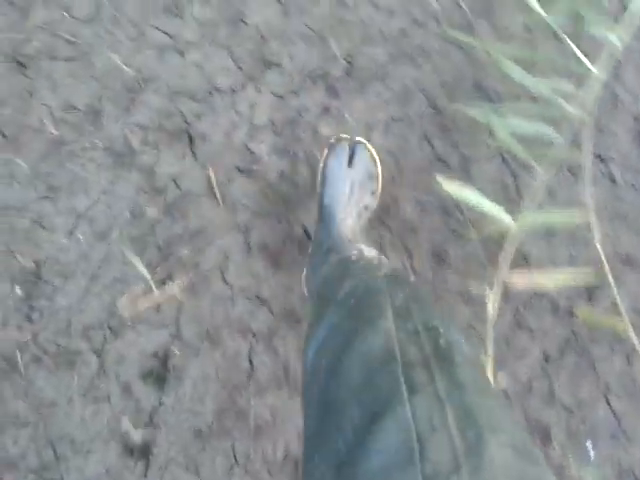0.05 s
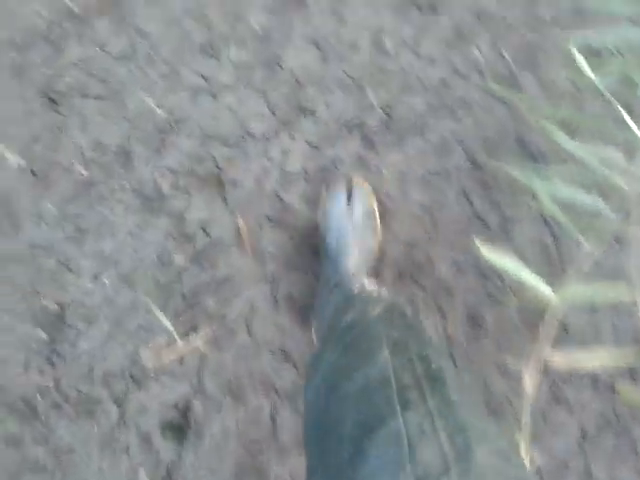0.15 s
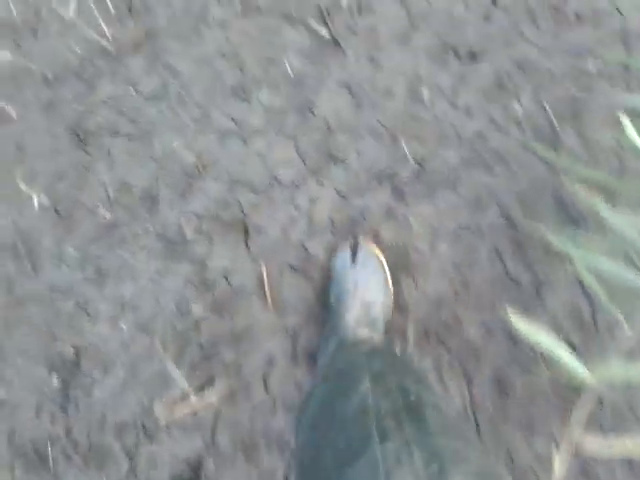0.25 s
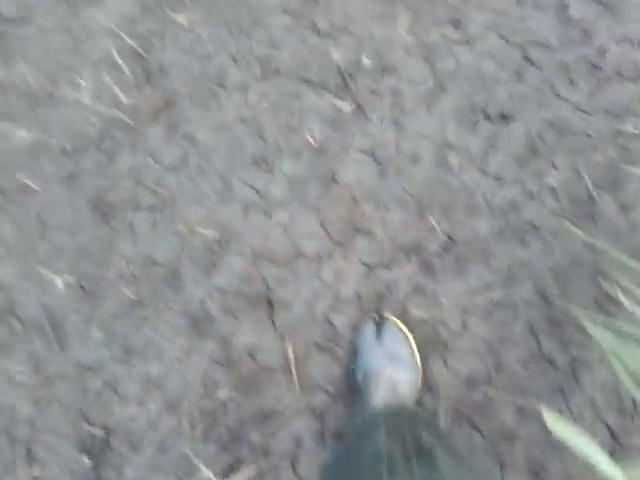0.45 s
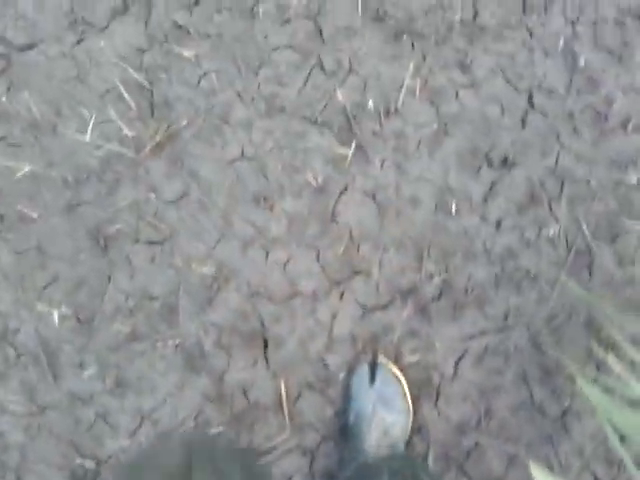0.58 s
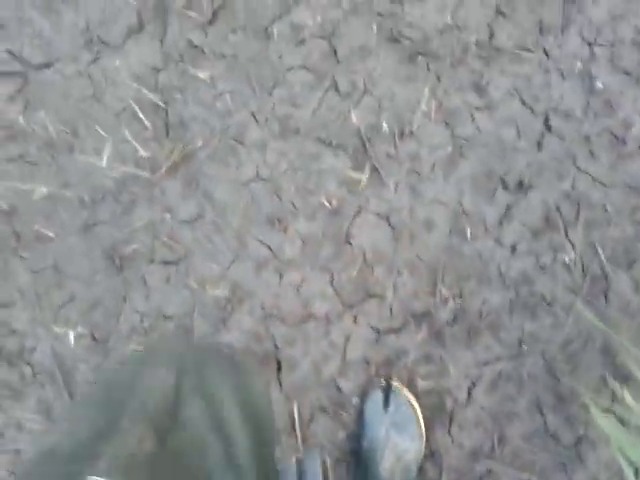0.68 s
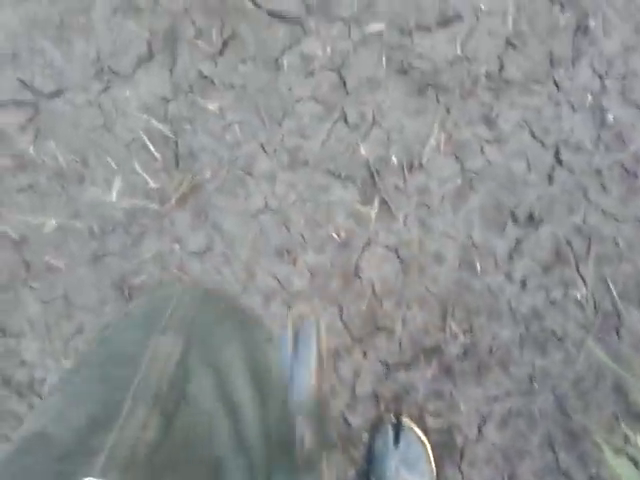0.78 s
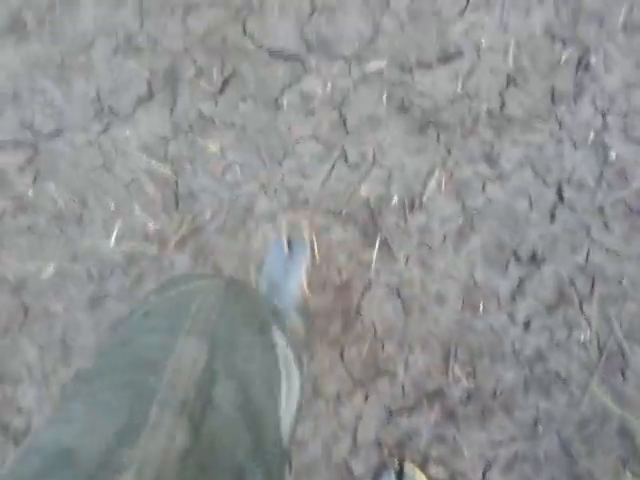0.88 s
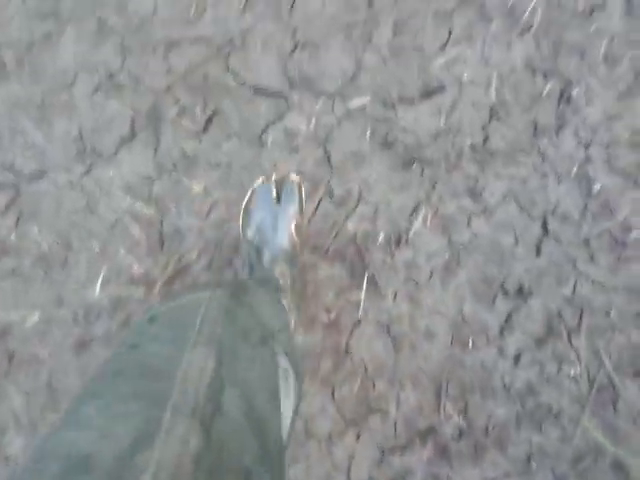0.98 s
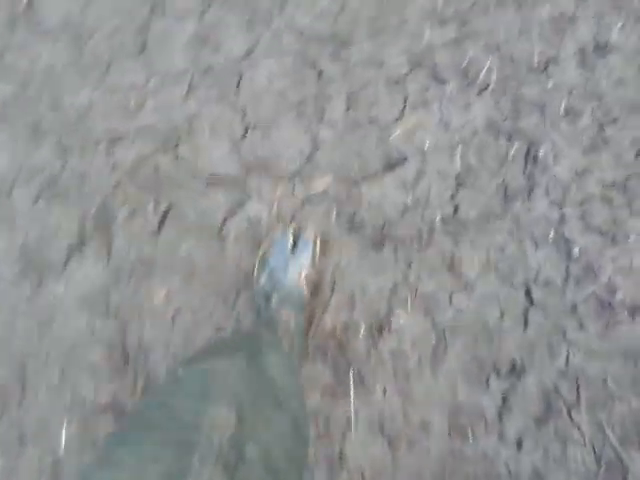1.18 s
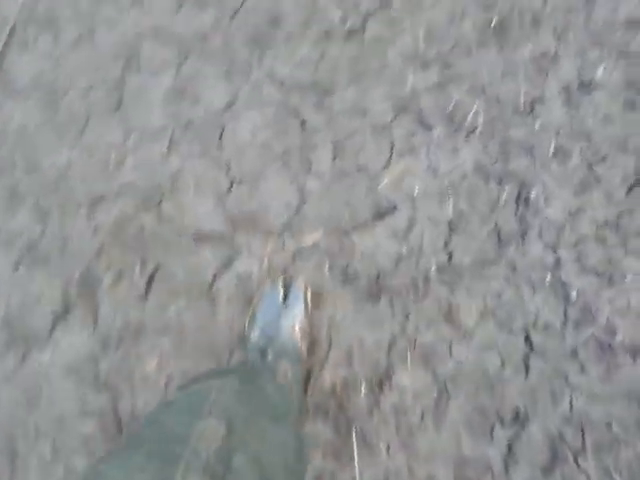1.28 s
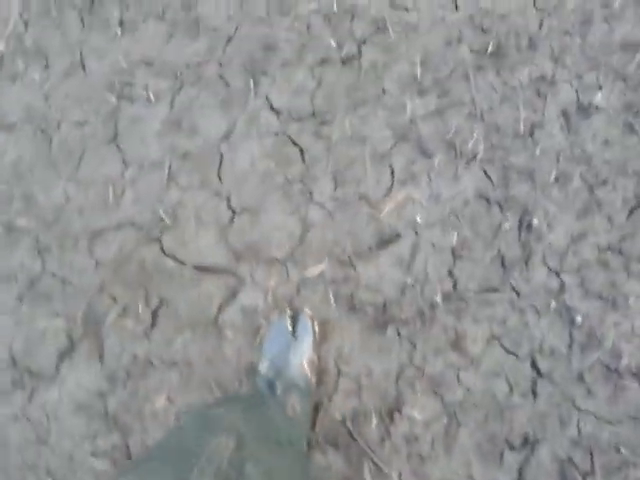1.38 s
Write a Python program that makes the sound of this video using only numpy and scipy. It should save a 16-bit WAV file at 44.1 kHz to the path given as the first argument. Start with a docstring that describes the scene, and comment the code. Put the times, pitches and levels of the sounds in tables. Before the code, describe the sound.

Footstep on dry cracked mud in rubber waders, close and boxy through a small camera microphone, outdoors. Faint wind hiss throughout. A short wavering squeak at 0.1-0.2 s leads to a loud, hard double knock at about 0.27 and 0.32 s, distorted, with quick gritty decay. Rustling and crumb pops continue until 0.8 s, then near quiet; light crackles return at 1.05, denser crunching at 1.23-1.34, and sharp ticks at 1.43-1.45 s.

```python
"""Outdoors on dry cracked mud: someone walks in rubber waders beneath a narrow-band camera microphone.
Wind hiss is noise coloured and flickering in half-octave bands; rustle is a dense sum of random grains.
A wader squeak is a fluttering tone with a weak octave; crumbs of crust pop as short rings with a sharp tick.
One boot lands as decaying modes with a noise tail, crust snaps and bass bumps, and overloads the recorder."""
import sys
import numpy as np
from scipy import signal
from scipy.fft import rfft, irfft
from scipy.io import wavfile
from scipy.ndimage import uniform_filter1d

SR = 44100
rng = np.random.default_rng(int(sys.argv[2]) if len(sys.argv) > 2 else 0)


def wav_record(signal):
    """Record a signal, one row per channel, as 16-bit PCM in the file named by sys.argv[1]."""
    frames = np.transpose(np.atleast_2d(signal))
    bounded = np.clip(frames, -1, 1)
    # unit amplitude maps onto the largest positive 16-bit level
    quanta = np.round(bounded * 32767).astype(np.int16)
    wavfile.write(sys.argv[1], SR, quanta)


N = 63945

# Spectrum of the wind hiss, relative: [f/Hz, density level/dB]
WIND_SPECTRUM = [(20, -36.5), (40, -28.5), (150, -21), (200, -17.5), (250, -5.5), (330, 1.5), (680, -2.5),
                 (1100, -4), (1600, -8.5), (2500, -12), (3400, -7.5), (3750, -16), (4100, -25), (4400, -38),
                 (4700, -71.5), (9000, -120)]
# Wind strength, relative: [t/s, level/dB of bands below 2.5 kHz, level/dB of bands above]
WIND_STRENGTH = [(0, 1, 3.5), (.09, 0, 2.5), (.2, 0, 0), (.4, 1, 1), (.6, 0, 0), (.75, 0, .7), (.85, .3, 0),
                 (1, -2, 0), (1.1, 1.5, -.7), (1.3, -.7, 0), (1.45, 0, 1.5)]
WIND_DB, WIND_FLICKER_DB = -48.5, 1.0  # overall rms level; scale of each band's flicker

# Rustle of the waders, before the microphone: [t/s, level/dB]
RUSTLE_LEVEL = [(0, -52.5), (.08, -49), (.15, -53.5), (.22, -51.5), (.3, -46), (.36, -48.5), (.47, -44),
                (.52, -47.5), (.62, -48), (.7, -43), (.79, -55), (.83, -61), (1, -58.5), (1.1, -55.5),
                (1.2, -53.5), (1.25, -43), (1.33, -48), (1.4, -62), (1.45, -32.5)]
RUSTLE_PER_S, RUSTLE_SPREAD_DB = 640, 2  # grain rate; mean of the exponential excess in level
RUSTLE_HZ, RUSTLE_OCTAVES = 625, 0.81  # median pitch and its standard deviation before limiting
RUSTLE_CYCLES, RUSTLE_TILT_DB = 1.3, 1.5  # sets grain length (half as many periods); dB per octave

# Rubber squeak, before flutter and microphone: [t/s, f/Hz, level/dB]
SQUEAK_TRACK = [(.094, 660, -57), (.101, 681, -42), (.11, 675, -58), (.121, 660, -56), (.125, 668, -40),
                (.133, 721, -32), (.138, 700, -52), (.145, 683, -39), (.158, 686, -39), (0.165, 690, -36.5),
                (.174, 730, -38), (.187, 770, -39.5), (.192, 787, -54), (.204, 795, -41), (.21, 790, -60)]
SQUEAK_FLUTTER_DB, SQUEAK_OCTAVE_DB = 2.2, -21  # flutter scale; octave against fundamental

# Popping crumbs of crust, the last row a knock just as the sound ends: [t/s of centre, peak level/dB, f/Hz,
# length/ms, tick level/dB against the ring]
CRUMB_POPS = [(0.035, -36.0, 450.0, 3.0, -10.0), (0.083, -38.0, 500.0, 3.0, -8.0),
              (0.1345, -35.0, 370.0, 6.0, -15.0), (0.1804, -42, 1834.0, 1.4, -3.0),
              (0.2285, -47.5, 3540, 2.2, -3.0), (0.236, -33.2, 700, 5, -10.0),
              (0.3269, -28.5, 307, 6.8, -10.0), (0.3432, -37, 840.0, 8.3, -10.0),
              (0.3759, -38, 1180, 1.16, -3.0), (0.4014, -44, 3270, 0.89, -3.0),
              (0.4164, -44, 2000.0, 1.6, -3.0), (0.4182, -38, 435, 4.1, -10.0),
              (0.425, -42, 2181.0, 1.6, -3.0), (0.4555, -38, 1189.0, 1.5, -3.0),
              (0.4565, -35.0, 400.0, 3.0, -10.0), (0.462, -45, 2800, 1.8, -3.0),
              (0.4662, -42.5, 1170, 3.5, -3.0), (0.475, -35.0, 420.0, 3.0, -10.0),
              (0.4911, -31.5, 537, 2.6, -10.0), (0.4954, -34, 1542.0, 1.87, -3.0),
              (0.498, -33.0, 500.0, 3.0, -10.0), (0.5072, -33, 463, 2.8, -10.0),
              (0.5113, -31.5, 716, 1.7, -10.0), (0.5161, -37.5, 1980, 1.7, -3.0),
              (0.5531, -36.5, 2020, 1.2, -3.0), (0.5622, -35.5, 576, 4, -10.0),
              (0.5758, -29.5, 240, 5.9, -10.0), (0.5835, -35.0, 260.0, 5.0, -20.0),
              (0.5985, -36.0, 450.0, 3.0, -6.0), (0.6545, -35, 1280, 1.2, -3.0),
              (0.661, -38.0, 400.0, 3.0, -8.0), (0.685, -37.0, 550.0, 3.0, -8.0),
              (0.7014, -37.5, 707.0, 5.7, -10.0), (0.7254, -35.5, 1950, 0.75, -3.0),
              (0.738, -38.0, 600.0, 3.0, -8.0), (0.7438, -41, 1100, 3.5, -3.0),
              (0.7755, -36.5, 455, 4.6, -10.0), (0.846, -41.0, 1350.0, 3.5, -10.0),
              (1.056, -38.0, 450.0, 8.0, -10.0), (1.081, -39.0, 600.0, 3.0, -8.0),
              (1.101, -42, 1400, 3.5, -3.0), (1.11, -42, 1265, 3.5, -3.0),
              (1.149, -39.0, 1300.0, 2.0, -5.0), (1.168, -38.0, 650.0, 3.0, -4.0),
              (1.2275, -35.0, 500.0, 3.0, -10.0), (1.2353, -38, 2000.0, 1.5, -3.0),
              (1.2378, -24, 540, 3.07, -10.0), (1.2466, -41, 1681.0, 2.6, -3.0),
              (1.253, -29.5, 1460, 1.17, -3.0), (1.2548, -28.0, 550.0, 2.4, -12.0),
              (1.2705, -36.0, 600.0, 5.0, -6.0), (1.2949, -36.5, 2000.0, 1.95, -3.0),
              (1.2985, -29.5, 714, 4.1, -10.0), (1.3022, -28, 800, 1.46, -10.0),
              (1.307, -35.5, 1450, 2.0, -3.0), (1.3349, -32.5, 740, 2.8, -10.0),
              (1.3707, -45, 3510, 2.8, -3.0), (1.3781, -41, 3668.0, 0.89, -3.0),
              (1.3891, -40, 2280, 3.1, -3.0), (1.3895, -38.0, 800.0, 1.52, -2.0),
              (1.4045, -37.0, 600.0, 3.0, -8.0), (1.435, -23.0, 1200.0, 1.3, -1.0),
              (1.4492, -27.0, 900.0, 2.0, -6.0)]
# Resonances excited by a tick: [f/Hz, level/dB against the tick level, length/ms]
TICK_RESONANCES = [(900, -3, 0.807), (2000, -4.5, 1.0), (3534, -4, 1.8)]

# One-sided thuds that shake the camera body: [t/s of centre, signed peak, half length to 1/e / ms]
BODY_THUDS = [(0.2691, 0.19, 0.43), (.31639, -0.215, 1.01), (0.5777, 0.000043, 1.3)]

# Boot knocks on the crust: [t/s of start, signed gain of the low, the middle and the high mode]
BOOT_KNOCKS = [(.24431, -.1, .36, -.28), (.25928, .14, -.33, .26), (.26702, .06, -.82, 1.22),
               (.26858, .75, .44, 3.0), (.31407, .01, 1.14, -1.55)]
# Modes of boot and crust: [f/Hz, 60 dB decay time/s]
BOOT_RESONANCES = [(480, 0.02), (688, 0.012), (1104, 0.0039)]
# Crust snapping under the sole: [t/s of centre, peak level/dB, f/Hz, length/ms]
CRUST_SNAPS = [(.26923, 0.5, 2690, 0.59), (.31596, 2, 1905, 0.37)]
KNOCK_RISE_S = .0007  # time constant of the onset
DEBRIS_DB, DEBRIS_T60_S, DEBRIS_HZ = -40, .07, 560  # level against the knock, decay time, centre

MIC_LOW_HZ, MIC_HIGH_HZ = 218, 4050  # half-power edges of the microphone band
CLIP, HISS_DB, TOP_HZ = .715, -100, 16500  # recorder overload limit, hiss level, top cutoff


def undb(db):
    """Level and amplitude: a gain is ten to the power of the decibels over twenty."""
    return 10 ** (np.asarray(db) / 20)


def unit(x):
    """Normalisation: a signal divided by its root mean square has rms 1."""
    return x / np.sqrt(np.mean(x ** 2))


def walk(rate):
    """Smoothed randomness: values held 1 / rate s are averaged twice and scaled up again."""
    hold = int(SR / rate)
    steps = np.repeat(rng.standard_normal(N // hold + 1), hold)
    slewed = uniform_filter1d(uniform_filter1d(steps, hold), hold)
    return 1.7 * slewed[:N]


def band(x, hz, width):
    """Resonance: a second-order peak passes a band of the given width in Hz."""
    return signal.lfilter(*signal.iirpeak(hz, hz / width, fs=SR), x)


def pops(rows, phases):
    """Transient oscillation: a cosine of few cycles under a Gaussian of quick swell and slower fade."""
    pad = 2048  # room for bursts that cross either end
    out = np.zeros(N + 2 * pad)
    for (s, db, hz, ms), phase in zip(rows, phases):
        half = int(ms * SR / 500)
        t = np.arange(-half, half + 1) / SR
        width_ms = ms * np.where(t < 0, .5, .7)
        shape = np.exp(-(t * 1000 / width_ms) ** 2)
        at = pad + int(s * SR) - half
        out[at:at + len(t)] += undb(db) * shape * np.cos(2 * np.pi * (hz * t + phase))  # phase in cycles
    return out[pad:pad + N]


def wind():
    """Spectral shaping: coloured noise splits into overlapping bands that follow the wind and flicker apart."""
    hz, db = np.array(WIND_SPECTRUM).T
    f = np.fft.rfftfreq(N, 1 / SR)[1:]
    colour = undb(np.interp(np.log(f), np.log(hz), db))
    noise = rfft(rng.standard_normal(N))[1:] * colour
    t = np.arange(N) / SR
    s, low_db, high_db = np.array(WIND_STRENGTH).T
    out = 0
    for centre in np.arange(4, 13, .5):  # log2 of the band centre in Hz
        weight = np.clip(1 - 2 * abs(np.log2(f) - centre), 0, 1)
        part = irfft(np.r_[0, noise * weight], N)
        strength_db = np.interp(t, s, low_db if centre < 11.4 else high_db)
        out = out + part * undb(strength_db + WIND_FLICKER_DB * walk(15))
    return unit(out) * undb(WIND_DB)


def rustle():
    """Granular superposition: many random rubbery bursts merge into a patter that follows the leg movement."""
    u = rng.random((2000, 5))[:int(RUSTLE_PER_S * N / SR)]
    start = u[:, 0] * N / SR
    # two uniform draws make one normal deviate
    normal = np.sqrt(-2 * np.log(1 - u[:, 1])) * np.cos(2 * np.pi * u[:, 2])
    octaves = RUSTLE_OCTAVES * normal
    hz = np.clip(RUSTLE_HZ * 2 ** octaves, 200, 4000)
    db = -RUSTLE_SPREAD_DB * np.log(1 - u[:, 3]) + RUSTLE_TILT_DB * octaves
    length_ms = 1000 * RUSTLE_CYCLES / hz / 2
    grains = pops(np.c_[start, db, hz, length_ms], u[:, 4])
    s, level_db = np.array(RUSTLE_LEVEL).T
    return unit(grains) * undb(np.interp(np.arange(N) / SR, s, level_db))


def squeak():
    """Frequency modulation: rubber on rubber sounds a tone of wavering pitch and level with a weak octave."""
    t = np.arange(N) / SR
    s, hz, db = np.array(SQUEAK_TRACK).T
    pitch = np.interp(t, s, hz) * (1 + .035 * walk(220))
    phase = 2 * np.pi * np.cumsum(pitch) / SR
    tone = np.sin(phase) + undb(SQUEAK_OCTAVE_DB) * np.sin(2 * phase)
    level_db = np.interp(t, s, db, -120, -120) + SQUEAK_FLUTTER_DB * walk(260)
    return np.sqrt(2) * tone * undb(level_db)


def crumbs():
    """Impulse excitation: each crumb is a short ring with a sharp multi-resonant tick at its front."""
    s, db, hz, ms, tick_db = np.array(CRUMB_POPS).T
    u = rng.random((len(s), 4))
    out = pops(np.c_[s, db, hz, ms], u[:, 0])
    front = s - ms / 4000  # a quarter length ahead of the centre
    same = np.ones(len(s))
    for k, (mode_hz, mode_db, mode_ms) in enumerate(TICK_RESONANCES):
        rows = np.c_[front, db + tick_db + mode_db, mode_hz * same, mode_ms * same]
        out += pops(rows, u[:, k + 1])
    return out


def thuds():
    """Unipolar pulses: Gaussian pressure bumps of one sign carry the bass."""
    t = np.arange(N) / SR
    return sum(peak * np.exp(-((t - s) * 1000 / ms) ** 2) for s, peak, ms in BODY_THUDS)


def boot():
    """Modal decay: knocks ring the modes of boot and crust, crust snaps, and debris settles as fading noise."""
    t = np.arange(N) / SR
    out = pops(CRUST_SNAPS, [0, .5])
    noise = band(band(rng.standard_normal(N), DEBRIS_HZ, 700), DEBRIS_HZ, 700)
    grit = unit(noise) * undb(1.5 * walk(300))
    for s, *gains in BOOT_KNOCKS:
        u = np.maximum(t - s, 0)
        ring = sum(g * np.sin(2 * np.pi * hz * u) * undb(-60 * u / t60)
                   for g, (hz, t60) in zip(gains, BOOT_RESONANCES))
        tail = np.linalg.norm(gains) * grit * undb(DEBRIS_DB - 60 * u / DEBRIS_T60_S)
        rise = 1 - np.exp(-u / KNOCK_RISE_S)
        out += rise * (ring + tail)
    return out


def scene():
    """Linear superposition: close sounds pass the microphone band; thuds and ready-coloured wind bypass it."""
    near = rustle() + squeak() + crumbs() + boot()
    size = N + 4096
    f = np.fft.rfftfreq(size, 1 / SR) + 1e-9
    gain = 1 / np.sqrt((1 + (MIC_LOW_HZ / f) ** 8) * (1 + (f / MIC_HIGH_HZ) ** 60))
    heard = irfft(rfft(near, size) * gain, size)[:N]
    return (wind() + heard + thuds())[None]


def record(dry):
    """Amplitude limiting: the recorder clips hard, adds a trace of hiss and cuts the top."""
    x = np.clip(dry, -CLIP, CLIP) + undb(HISS_DB) * rng.standard_normal(dry.shape)
    taps = signal.firwin(121, TOP_HZ, window=("kaiser", 7), fs=SR)
    return signal.fftconvolve(x, taps[None], "same")


dry = scene()
out = record(dry)
wav_record(out)
```